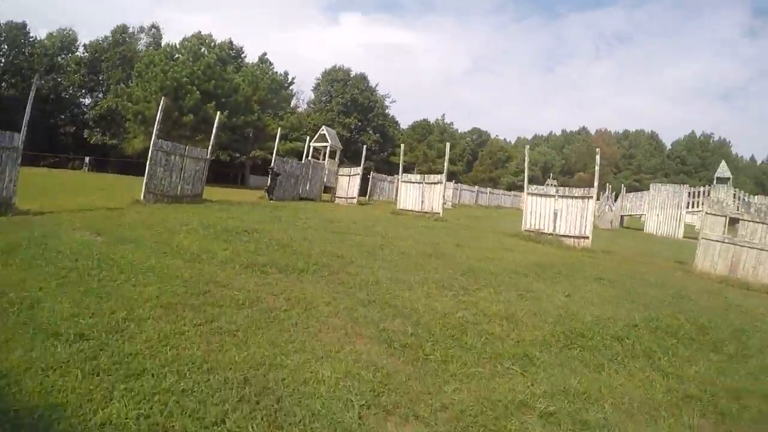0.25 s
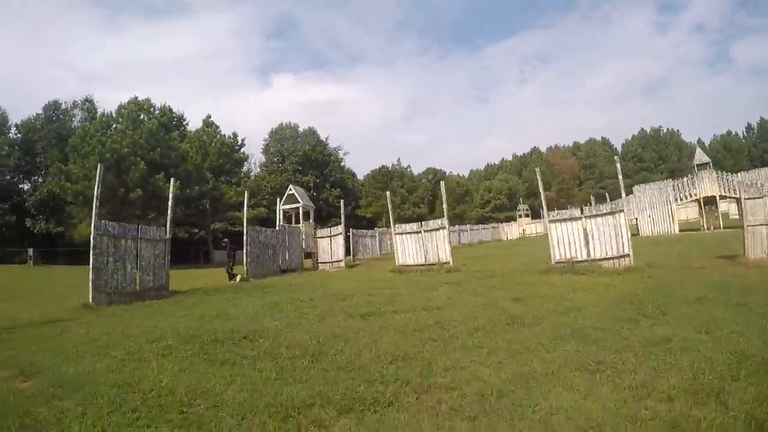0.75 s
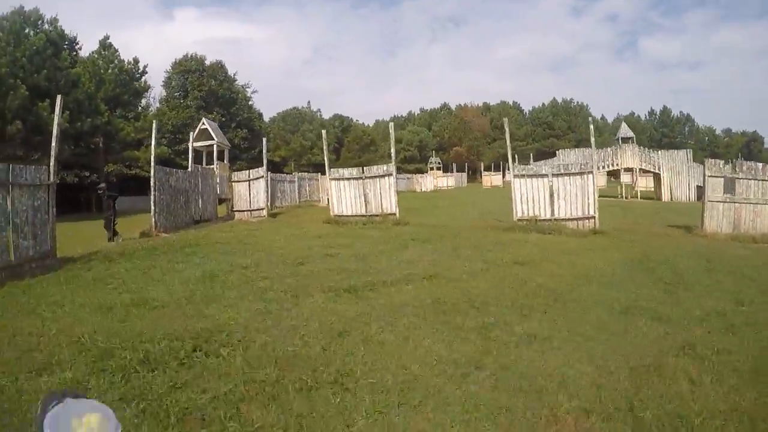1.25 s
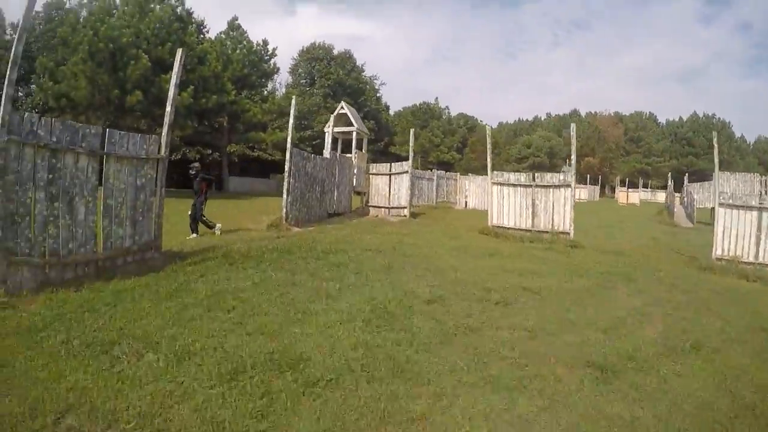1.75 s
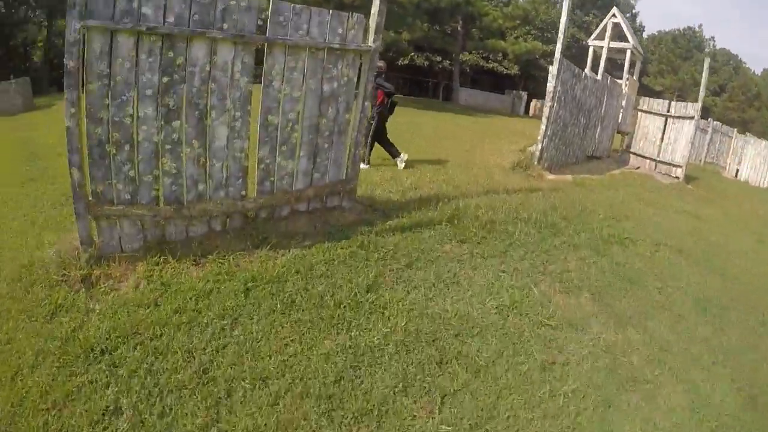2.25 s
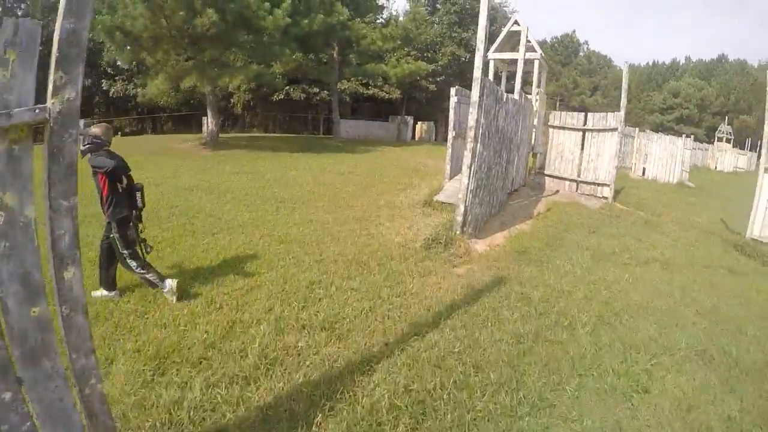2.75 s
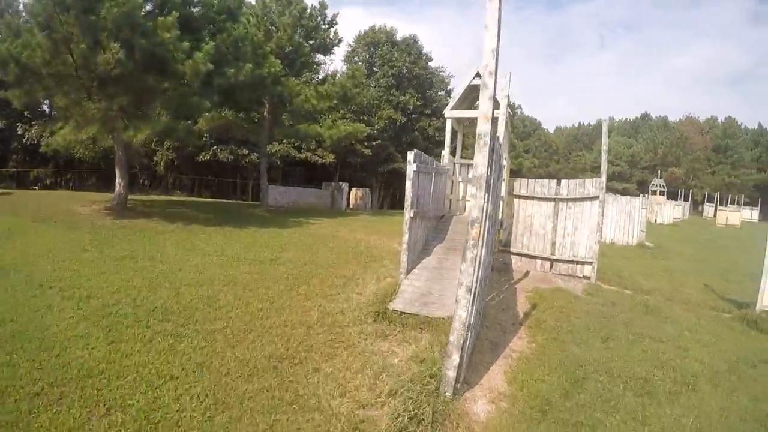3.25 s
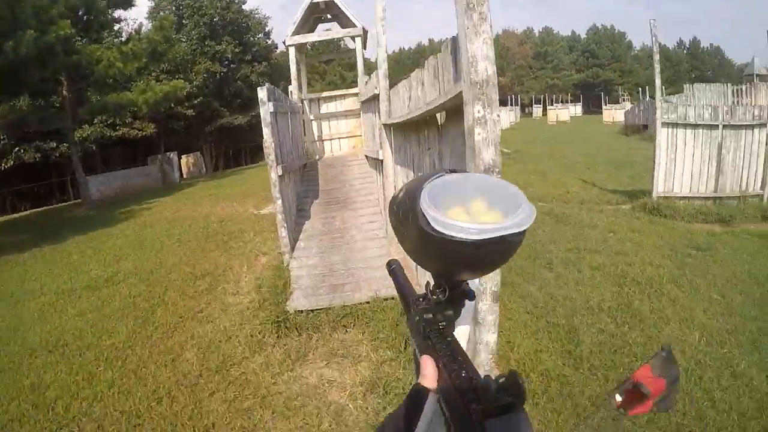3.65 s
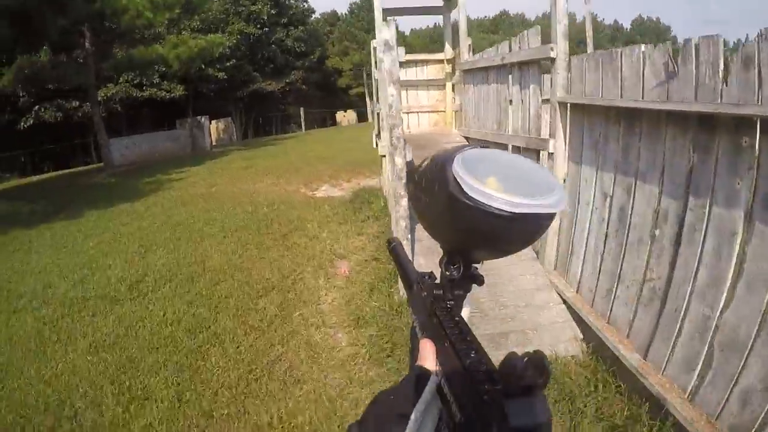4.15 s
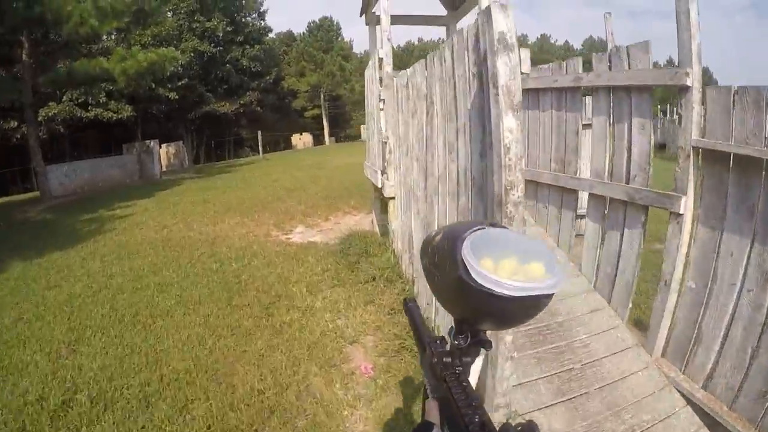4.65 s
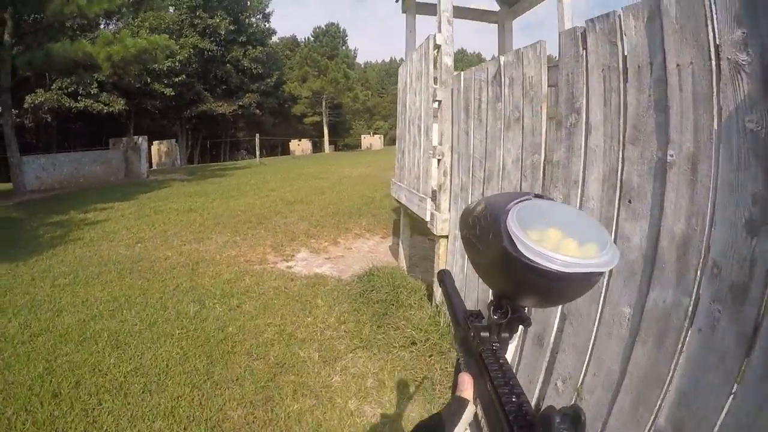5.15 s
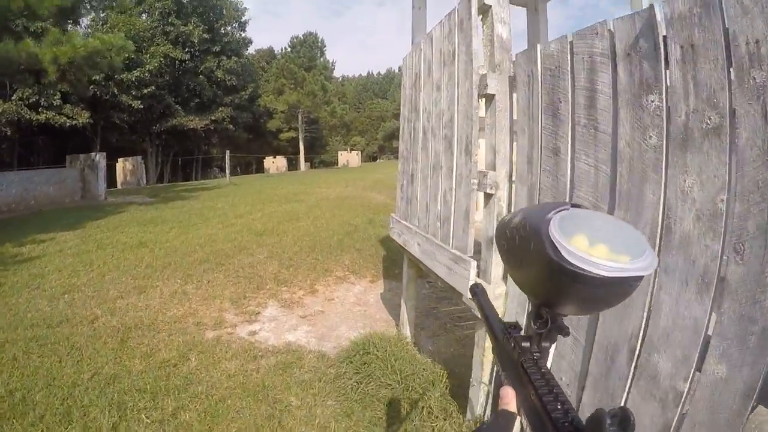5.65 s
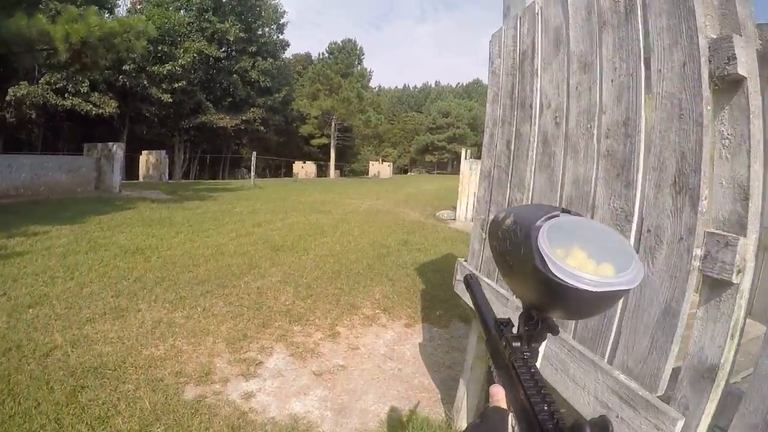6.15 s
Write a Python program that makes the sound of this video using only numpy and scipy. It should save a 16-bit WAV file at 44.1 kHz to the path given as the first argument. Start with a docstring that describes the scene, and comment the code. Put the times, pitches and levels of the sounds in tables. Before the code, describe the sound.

Someone runs across an open grass field wearing the microphone: low booming steps, hard plastic clacks, rubbing clothes and small pellets rattling in a hopper.

```python
"""A knock of loose plastic and a deep thud come first: a player runs over grass with a head-worn camera.
Each footfall pushes the microphone with low, sharp-crested swings, and the housing rings in several modes.
Grass and clothes rustle with the stride as shaped noise and tiny slips, among short rubs and padded bumps.
Paintballs tick in the hopper as short pitched bursts. All is close and dry, over a faint open field."""
import sys
import numpy as np
from scipy import signal
from scipy.fft import rfft, irfft
from scipy.io import wavfile
from scipy.ndimage import uniform_filter1d

SR = 44100
rng = np.random.default_rng(int(sys.argv[2]) if len(sys.argv) > 2 else 0)


def transcribe(u):
    """Save the signal u as a 16-bit wav file named by the first command-line argument.

    u: samples, shape (n,) or (channels, n), limited to [-1, 1]; the rate is SR.
    q: integer samples, one column per channel.
    """
    v = np.clip(np.atleast_2d(u).T, -1, 1)
    q = np.round(v * 32767).astype(np.int16)
    wavfile.write(sys.argv[1], SR, q)


N = 282240  # samples, 6.4 s

# The stride under the head-worn microphone: heel, forefoot, then the leg swishing through the grass.
# Each row: heel time in seconds, relative heel level in dB, heel swing in Hz, forefoot delay in seconds,
# relative forefoot level in dB, swish delay in seconds (negative is before the heel), swish fade in seconds,
# relative swish level in dB, relative level of the fizzing blades in dB.
FOOTFALLS = [(0.053, -9, 30, 0.047, -23, -0.026, 0.017, -40.5, -57),
             (0.219, -3.5, 36, 0.063, -34, -0.03, 0.0092, -20, -63),
             (0.421, -5.5, 32.8, 0.051, -17, 0.026, 0.012, -29, -63),
             (0.727, -11.5, 29.6, 0.06, -21, -0.048, 0.053, -49.5, -66),
             (0.955, -2, 35, 0.055, -17, 0.034, 0.027, -36, -66),
             (1.231, -9.5, 40, 0.063, -8.5, 0.018, 0.043, -42, -76),
             (1.478, -27, 42.8, 0.021, -19, 0.075, .02, -54, -77.5),
             (1.81, -6, 23.2, 0.062, -27, -0.012, 0.035, -36, -55),
             (2.136, 0.5, 30.4, 0.085, -4, 0.035, 0.075, -39, -52.5),
             (2.375, -9, 29, 0.081, -19, -.015, 0.017, -50, -64),
             (2.595, -6, 27, 0.036, 1, 0.028, 0.011, -22, -50),
             (2.87, -13, 25, 0.055, -16, 0.06, 0.021, -38.5, -53),
             (3.191, -10, 25.2, 0.055, -5, 0.023, 0.055, -39.5, -56),
             (3.489, -11.5, 26.2, 0.026, -25, .025, 0.027, -39, -63),
             (3.755, -7.5, 23.4, 0.06, -15.5, 0.046, 0.027, -38, -52),
             (3.99, -4, 24.6, 0.0477, 0.5, 0.038, 0.059, -35.5, -55.5),
             (4.225, -7, 33.4, 0.053, -11, -0.031, 0.05, -35.5, -59),
             (4.565, -12, 20.9, 0.049, -50, -0.051, 0.13, -43, -74),
             (4.805, -9.5, 31.4, 0.06, -5, 0.044, 0.054, -41, -61),
             (5.197, -5.5, 23.8, 0.061, -23, 0.036, .045, -36.5, -68),
             (5.48, -7.5, 26.7, 0.051, -3.5, 0.044, 0.059, -32.5, -58),
             (5.793, -8.5, 33.3, 0.063, -13, .09, 0.12, -39.5, -81),
             (6.102, -9, 37.4, 0.038, -5.5, 0.041, 0.069, -41.5, -69)]


def thuds(width_turns=0.59, lean=0.74, sharpness=0.092, level_db=-1, forefoot_hz=31):
    """Heel and forefoot each give one deep, sharp-crested push, with a dip before and a stronger rebound after."""
    out = np.zeros(N)
    t = np.arange(-SR // 8, SR // 8) / SR
    for s, heel_db, heel_hz, delay, forefoot_db, *_ in FOOTFALLS:
        contacts = (s, heel_db, heel_hz), (s + delay, forefoot_db, forefoot_hz)
        for at, db, hz in contacts:
            turns = hz * t
            swing = np.cos(2 * np.pi * turns) + sharpness * np.cos(4 * np.pi * turns)
            envelope = np.exp(-(turns / width_turns) ** 2) * (1 + lean * turns)
            add(out, at + t[0], amp(db + level_db) * envelope * swing)
    slow_drift = uniform_filter1d(out, size=SR // 8)
    return out - slow_drift


# The plastic housing knocking in its mount, right at the microphone.
# Each row: start in seconds, relative force in dB.
HOUSING_KNOCKS = [(0.0005, -7), (0.182, 13.5), (0.1957, -4.5), (0.2029, -6.5), (0.265, -3.5),
                  (0.3625, -11.5), (0.4396, -7), (0.4496, 9), (0.5228, -2), (0.6813, -7), (0.9796, -5.5),
                  (0.9878, 11), (1.246, 7.5), (1.2997, -23), (1.5974, -22), (1.7384, -20.5),
                  (1.7765, -14.5), (1.8005, -17.5), (2.0429, -12.5), (2.0761, 3), (2.0957, -7),
                  (2.1175, -13.5), (2.1655, 2.5), (2.1952, -18), (2.2335, -10), (2.2432, -16.5),
                  (2.2705, -20), (2.4373, -23), (2.514, -11), (2.6034, -17), (2.6214, -10), (2.6762, 5.5),
                  (2.6989, -19.5), (3.221, 8.5), (3.2781, -0.5), (3.4735, -14.5), (3.9826, -10.5),
                  (4.0089, -9.5), (4.0272, -10.5), (5.48, -22), (5.4879, -18), (5.5032, -16),
                  (5.5155, -13.5), (5.55, -16), (5.557, -18)]
# What the housing and its mount ring with. Each row: nominal pitch in Hz, relative level in dB,
# time to fall by 60 dB in seconds before the extra damping of the settling shell.
HOUSING_MODES = [(135, -4, 0.013), (277, -21, 0.012), (500, -39, 0.0025), (620, -18, 0.0022),
                 (884, -10, 0.0092), (1337, -8, 0.012), (1693, -7.5, 0.017), (2431, -11, 0.011),
                 (2837, -12.5, 0.0059), (3130, -32.5, 0.075), (4086, -19, 0.008), (4400, -58, 0.011),
                 (5294, -23, 0.015), (5830, -31, 0.0073)]
# Colour of the crack in a knock. Each row: frequency in Hz, relative level in dB per Hz.
CRACK_SPECTRUM = [(300, -22), (2400, -15.5), (3400, 1), (4000, 9.5), (4900, 3.5), (5400, 4), (6300, 11),
                  (7300, -5), (10000, -2.5), (14000, -19), (16000, -24.5)]


def knocks(blows, level_db=1, scatter_db=2, crack_db=-37, crack_growth=2, dulling=0.06, mount_give=0.16):
    """The housing rings until it settles on its mount, which answers with a low bump; hard knocks crack more."""
    out = np.zeros(N)
    t = np.arange(SR // 12) / SR
    hz, mode_db, t60 = np.transpose(HOUSING_MODES)[:, :, None]
    of_mount = hz < 300
    age = np.maximum(t - .0048 * of_mount, 0)  # the mount answers 4.8 ms late
    settling = .2 + .8 * np.exp(-(t / .007) ** 4)
    damping = np.where(of_mount, 1, settling)
    sign = (-1) ** np.arange(len(HOUSING_MODES))[:, None]
    places = rng.standard_normal((len(blows), 2, len(HOUSING_MODES), 1))
    cracks = rng.standard_normal((len(blows), len(t)))
    contact = signal.windows.hann(9) / 4  # a brief contact rounds the onset
    crack_fade = amp(-60 * t / .007) * np.minimum(t / .0003, 1)
    for (s, db), (place, grip), noise in zip(blows, places, cracks):
        # light touches land anywhere and load the shell differently; hard ones hit the same stop
        glancing = np.clip(.3 - db / 12, .3, 1.2)
        detuned = hz * (1 + .025 * glancing * grip)
        # soft contact dulls the highest modes; the padded mount yields under hard blows
        dulled_db = dulling * np.clip(db, -12, 0) * (hz > 3500)
        yielded_db = mount_give * max(db, 0) * of_mount
        colour_db = mode_db + dulled_db - yielded_db
        decay = damping * amp(colour_db + scatter_db * glancing * place - 60 * age / t60)
        modes = sign * decay * np.sin(2 * np.pi * detuned * age)
        ring = np.convolve(modes.sum(0), contact, "same")
        crack = coloured(noise, CRACK_SPECTRUM) * crack_fade
        # a glancing touch slides, and so sounds grittier
        grit_db = 7 * (glancing - .3)
        crack_level = amp(crack_db + grit_db + crack_growth * np.clip(db, 0, 9))
        add(out, s, amp(db + level_db) * (ring + crack_level * crack))
    return out


def chatter(body, over_body_db=14, scatter_db=3, count=36):
    """Light knocks at random moments, firmer when the gear rubs harder: rows of (s, force dB)."""
    blows = []
    for at, luck in rng.random((count, 2)):
        rubbing_db = min(body[int(at * N)], -40)
        blows.append((at * N / SR, rubbing_db + over_body_db + scatter_db * (2 * luck - 1)))
    return blows


# The mount bumping softly against its padding, close at the microphone.
# Each row: start in seconds, relative level in dB.
PADDED_BUMPS = [(1.597, -19), (1.781, -28), (1.796, -19), (2.098, -5.5), (2.338, -25), (2.605, -13),
                (5.227, -15), (5.503, -13.5)]


def bumps(level_db=5, hz=122):
    """A padded blow leaves only the low swing of the mount, a little different in pitch each time."""
    out = np.zeros(N)
    t = np.arange(SR // 8) / SR
    swell = (1 - np.exp(-t / .003)) * amp(-60 * t / .04)
    for (s, db), detune in zip(PADDED_BUMPS, rng.uniform(.9, 1.1, len(PADDED_BUMPS))):
        add(out, s, amp(db + level_db) * swell * np.sin(2 * np.pi * hz * detune * t))
    return out


# Clothes and gear rubbing all the while near the microphone, stronger again once the marker is raised.
# Each row: time in seconds, relative body level in dB, relative fizz level in dB.
CLOTH_RUBBING = [(0.0, -43, -57), (0.33, -50, -75), (0.6, -59.5, -77.5), (0.9, -61, -77),
                 (1.18, -57, -70.5), (1.42, -65.5, -87.5), (2.0, -50, -64), (2.25, -40, -62),
                 (2.55, -44.5, -57), (2.8, -51.5, -65), (3.05, -48, -65), (3.31, -54, -67),
                 (3.4, -46, -62.5), (3.7, -41, -61), (4.4, -49.5, -62.5), (5.4, -51.5, -63),
                 (6.0, -52, -60), (6.4, -54.5, -64)]
# Thin hisses between the steps. Each row: centre in seconds, half length in seconds, relative level in dB.
THIN_HISSES = [(1.075, 0.076, -61.5), (2.532, 0.011, -55), (4.176, 0.0094, -51)]


def rustle_levels():
    """Levels in dB of the body and fizz of the rustle: powers of steady rubbing, swishes and hisses add up."""
    body, fizz = (amp(db) ** 2 for db in curve(CLOTH_RUBBING))
    for s, *_, delay, fade_s, swish_db, fizz_db in FOOTFALLS:
        swish = surge(s + delay, fade_s)
        body = body + (amp(swish_db) * swish) ** 2
        fizz = fizz + (amp(fizz_db) * swish) ** 2
    for s, length, db in THIN_HISSES:
        distance = (np.arange(N) / SR - s) / length
        fizz = fizz + amp(db) ** 2 / (1 + np.square(distance) ** 4)  # flat top, steep sides
    return 10 * np.log10(body), 10 * np.log10(fizz)


# Colour of the swish of grass and cloth. Each row: frequency in Hz, relative level in dB per Hz.
SWISH_SPECTRUM = [(120, -33.5), (250, -4), (500, -7.5), (800, -6), (1050, 5), (1290, -4), (1600, -1.5),
                  (2050, -6), (2400, -2), (2750, -12), (3300, -20.5), (4200, -24.5), (6000, -26),
                  (11000, -57)]
# Colour of the fizzing blades. Each row: frequency in Hz, relative level in dB per Hz.
BLADES_SPECTRUM = [(2500, -10), (4200, -2), (4900, -1), (5600, 2), (6600, -7), (7600, -1.5), (8700, -10),
                   (10300, -8.5), (12500, -14), (14800, -10.5), (15600, -45)]


def rustle(body, fizz, body_db=-2, fizz_db=-2, crackle_db=-2, scrape_db=-7, scrape_growth=1.9):
    """Blades and cloth slip in tiny grains over a soft swish; firm strokes scrape the housing too."""
    swish_slips = crackle(per_s=1100, spread_db=4.5, low_hz=597, high_hz=4870, cycles=3.4)
    blade_slips = crackle(per_s=840, spread_db=-2.0, low_hz=3500, high_hz=13000, cycles=4.6)
    swish = rng.standard_normal(N) + amp(crackle_db) * swish_slips
    blades = rng.standard_normal(N) + amp(crackle_db) * blade_slips
    swish = patchy(coloured(swish, SWISH_SPECTRUM), depth_db=2.4)
    blades = patchy(coloured(blades, BLADES_SPECTRUM), depth_db=1.5)
    scrape_spectrum = [(60, -8), (150, -11.0), (400, -1.5), (800, 5.0), (1100, -5.0), (1600, 0.5),
                       (2100, -11), (4000, -35), (9000, -43.5)]
    scrape = coloured(grains(per_s=180, spread_db=-3.0), scrape_spectrum)
    pressure_db = scrape_growth * (body + 35) - 35  # the scrape grows faster than the rustle
    rubbing = amp(body + body_db) * swish + amp(fizz + fizz_db) * blades
    return rubbing + amp(pressure_db + scrape_db) * scrape


# Short rubs, narrow zips and a few faint, brief knocks, close by. Each row: centre in seconds, relative level
# in dB, half length in seconds, centre pitch in Hz, band width as a ratio (held within 1.05 to 2.2).
SHORT_RUBS_AND_KNOCKS = [(0.248, -38, 0.00078, 1700, 2), (0.65, -40, 0.0017, 1490, 1.2),
                         (0.87, -49, 0.0048, 800, 2.2), (1.539, -46, 0.008, 796, 2.3),
                         (1.783, -36.5, 0.0092, 790, 3.9), (2.098, -21.5, 0.0027, 640, 2.5),
                         (2.119, -25, 0.0028, 790, 2.4), (2.525, -36, 0.011, 1190, 4.6),
                         (2.876, -39.5, 0.003, 1120, 1.2), (2.909, -39, 0.005, 2780, 1),
                         (3.377, -44, 0.0097, 2750, 1.15), (3.821, -43, 0.013, 2820, 1.5),
                         (4.011, -21, 0.0028, 734, 3.8), (4.027, -24, 0.0035, 794, 2.7),
                         (4.184, -40, 0.0099, 2800, 1.04), (4.315, -40, 0.016, 1070, 1.65),
                         (4.871, -41.5, 0.025, 1130, 1.8), (4.513, -33, 0.00082, 1000, 2.8),
                         (5.132, -34, 0.0016, 1460, 1.07), (5.2284, -30.5, 0.0031, 676, 2.5),
                         (5.339, -40.5, 0.018, 770, 1.7), (5.507, -31.5, 0.0043, 766, 3),
                         (5.553, -27, 0.0016, 806, 2.1)]


def short_rubs_and_knocks(level_db=0):
    """Short bursts of noise banded around one pitch swell and fade: the longer ones rub, the briefest knock."""
    out = np.zeros(N)
    t = np.arange(-SR // 12, SR // 12) / SR
    noises = rng.standard_normal((len(SHORT_RUBS_AND_KNOCKS), len(t)))
    for (s, db, length, hz, ratio), noise in zip(SHORT_RUBS_AND_KNOCKS, noises):
        ratio = np.clip(ratio, 1.05, 2.2)
        band = [(80, -20), (hz / ratio, -11), (hz, 0), (hz * ratio, -12), (hz * ratio * 2, -24), (15000, -62)]
        swell = np.exp(-(t / length) ** 2 / 2)
        add(out, s + t[0], amp(db + level_db) * swell * coloured(noise, band))
    return out


# The clearest taps of paintballs in the hopper, within arm's reach.
# Each row: start in seconds, relative level in dB, ring in Hz.
HOPPER_TAPS = [(3.074, -28.5, 3280), (3.3687, -30, 2660), (3.7248, -27, 3230), (3.8029, -21.5, 2790),
               (4.1064, -27.5, 3180), (4.7468, -27, 3260), (5.054, -34.5, 3230), (5.2784, -31.5, 3380),
               (5.488, -23, 3170), (5.813, -28.5, 3230), (6.1195, -27, 3230)]


def ticks(level_db=-6):
    """A paintball taps the hopper: a short, dry burst of noise around one pitch."""
    out = np.zeros(N)
    t = np.arange(SR // 15) / SR
    fade = amp(-60 * t / .018) * np.minimum(t / .0005, 1)
    for (s, db, hz), burst in zip(HOPPER_TAPS, rng.standard_normal((len(HOPPER_TAPS), len(t)))):
        band = [(400, -25), (hz / 1.2, -11), (hz, 0), (hz * 1.2, -13), (5500, -22), (8000, -33), (15000, -48)]
        add(out, s, amp(db + level_db) * fade * coloured(burst, band))
    return out


def rattle(body, level_db=-13, stray_db=-23):
    """Many smaller taps of paintballs blend into a fine chatter that follows the rustle; a few stand out."""
    taps = crackle(per_s=450, spread_db=2, low_hz=3000, high_hz=3600, cycles=3)
    burst = rng.standard_normal(400) * np.exp(-np.arange(400) / 90)
    strays = signal.oaconvolve(grains(per_s=14, spread_db=1.5), burst)[:N]
    strays = coloured(strays, [(400, -25), (2600, -10), (3200, 0), (3900, -13), (8000, -33), (15000, -48)])
    shaking = amp(np.minimum(body, -42))
    return shaking * (amp(level_db) * taps + amp(stray_db) * strays)


# Colour of the low rumble at the microphone. Each row: frequency in Hz, relative level in dB per Hz.
SWAY_SPECTRUM = [(5, -71.5), (18, 6.5), (30, -5.5), (45, -5), (62, -16.5), (90, -26), (150, -36.5),
                 (300, -50), (1000, -80.5)]


def sway(rest_db=-29.5, step_db=-16, growth=.6, delay_s=0.016, fade_s=0.093):
    """Low rumble of air and of the moving body: it swells around each step, more for a hard one."""
    power = amp(rest_db) ** 2
    for s, heel_db, _, _, forefoot_db, *_ in FOOTFALLS:
        swell = amp(step_db + growth * max(heel_db, forefoot_db)) * surge(s + delay_s, fade_s)
        power = power + swell ** 2
    return np.sqrt(power) * coloured(rng.standard_normal(N), SWAY_SPECTRUM)


# Colour of the open field around the player. Each row: frequency in Hz, relative level in dB per Hz.
FIELD_SPECTRUM = [(100, 4.5), (400, 7), (800, 2.5), (1050, 7), (1250, -1.5), (1550, 8.5), (2000, -5),
                  (2500, -1.5), (3500, -12), (4800, -14.5), (5500, -8.5), (6500, -17.5), (11000, -25),
                  (15000, -50.5)]
FIELD_DB = -59.5  # rms level


def field():
    """The faint hush of the open field, heard through the housing: steady coloured noise."""
    return amp(FIELD_DB) * coloured(rng.standard_normal(N), FIELD_SPECTRUM)


def surge(s, fade_s):
    """An envelope that swells to 1 at time s and dies away as quickly."""
    distance = abs(np.arange(N) / SR - s) / max(fade_s, .002)
    return np.exp(-np.minimum(distance, 20))


def crackle(per_s, spread_db, low_hz, high_hz, cycles, count=16):
    """Many small slips, each a few cycles long at one of several pitches."""
    t = np.arange(400) / SR
    total = np.zeros(N)
    for hz in np.geomspace(low_hz, high_hz, count):
        slip = evened(np.exp(-hz * t / cycles) * np.sin(2 * np.pi * hz * t))
        total += signal.oaconvolve(grains(per_s / count, spread_db), slip)[:N] * np.sqrt(hz)
    return evened(total)


def grains(per_s, spread_db):
    """Sparse clicks of either sign at random moments, their sizes spread exponentially in dB."""
    size = amp(spread_db * np.minimum(rng.exponential(1, N), 4))
    struck = rng.random(N) < per_s / SR
    return evened(size * rng.choice([-1, 1], N) * struck)


def patchy(x, depth_db, order=14, size=7):
    """Rubbing surfaces change contact: the colour shifts in patches of some hundred Hz and some tens of ms."""
    z = signal.stft(x, nperseg=512, noverlap=384)[2]
    along_time = uniform_filter1d(rng.standard_normal(z.shape), order, 1)
    patches = evened(uniform_filter1d(along_time, size, 0))
    shifted = signal.istft(z * amp(depth_db * patches), nperseg=512, noverlap=384)[1]
    return evened(shifted[:N])


def coloured(x, points):
    """Gives x a spectrum of (Hz, dB) points, joined along log frequency, at rms 1."""
    f, db = np.transpose(points)
    hz = np.fft.rfftfreq(len(x), 1 / SR)
    gain = amp(np.interp(np.log(hz + 1), np.log(f + 1), db))
    return evened(irfft(rfft(x) * gain, len(x)))


def evened(x):
    """Scales to rms 1."""
    return x / np.sqrt(np.mean(x ** 2) + 1e-20)


def amp(db):
    """Turns dB into an amplitude factor."""
    return 10 ** (np.asarray(db) / 20)


def curve(rows):
    """Each column of a table of times, at every sample."""
    s, *columns = np.transpose(rows)
    return [np.interp(np.arange(N) / SR, s, c) for c in columns]


def add(mix, s, sound):
    """Mixes a sound in from time s, cut at both ends of the mix."""
    start = round(s * SR)
    sound = sound[max(-start, 0):]
    part = mix[max(start, 0):][:len(sound)]
    part += sound[:len(part)]


def scene():
    """Everything is close to the microphone and in the open: no echo."""
    body, fizz = rustle_levels()
    footfalls = thuds() + sway()
    housing = knocks(HOUSING_KNOCKS + chatter(body)) + bumps()
    rubbing = rustle(body, fizz) + short_rubs_and_knocks()
    hopper = ticks() + rattle(body)
    return (footfalls + housing + rubbing + hopper + field())[None]


EDGE_HZ = 16200  # upper band limit


def record(dry):
    """The hardest knocks overload the input with a rounded knee; then the treble softens up to a band limit."""
    clipped = dry / (1 + dry ** 12) ** (1 / 12)
    softened = np.convolve(clipped[0], [.1, .8, .1], "same")
    low_pass = signal.firwin(255, EDGE_HZ, window=("kaiser", 9), fs=SR)
    return signal.oaconvolve(softened[None], low_pass[None], "same")


dry = scene()
out = record(dry)
transcribe(out)
```